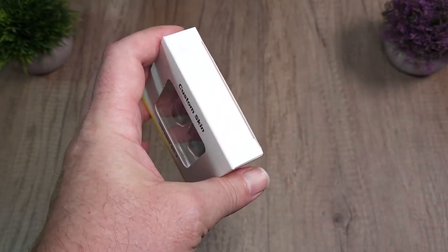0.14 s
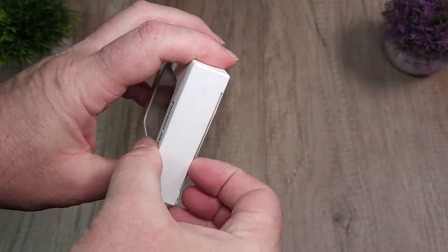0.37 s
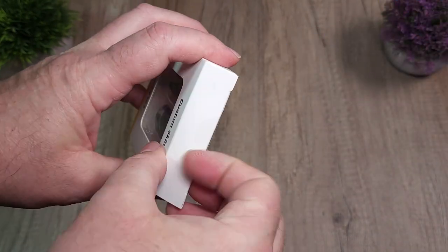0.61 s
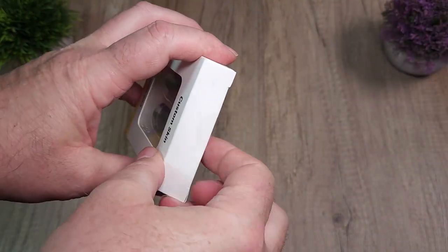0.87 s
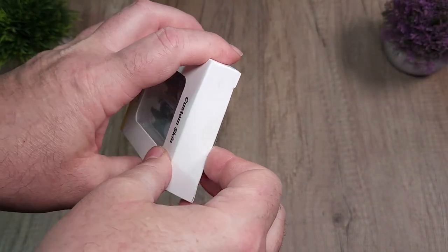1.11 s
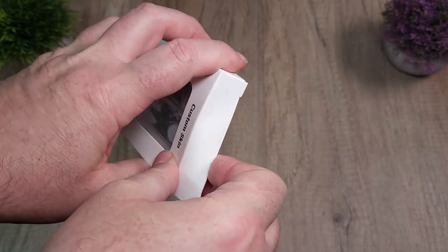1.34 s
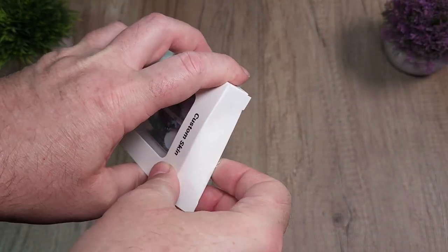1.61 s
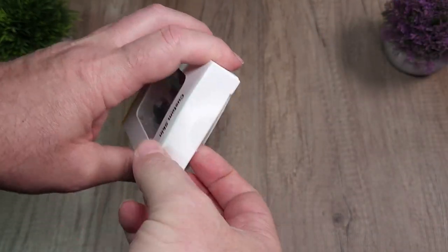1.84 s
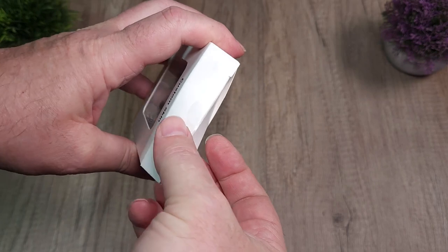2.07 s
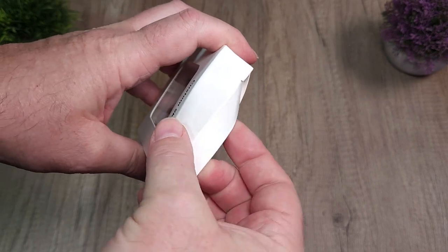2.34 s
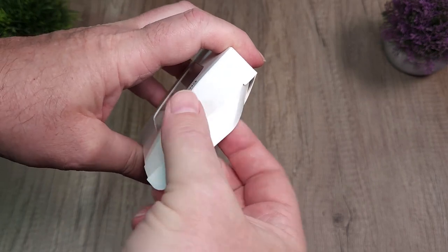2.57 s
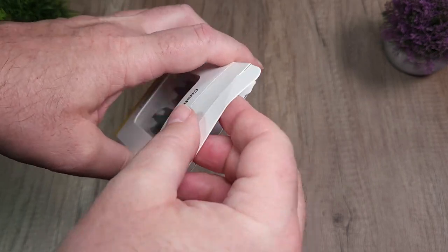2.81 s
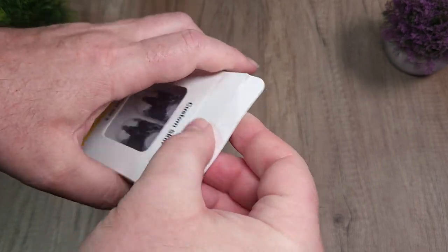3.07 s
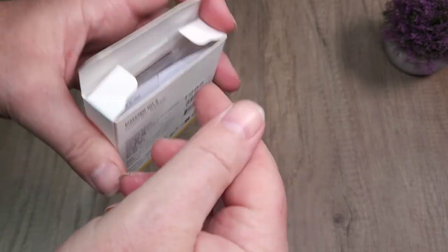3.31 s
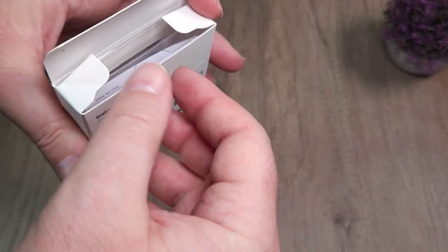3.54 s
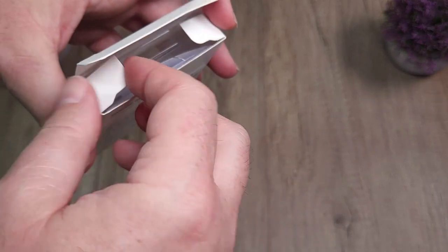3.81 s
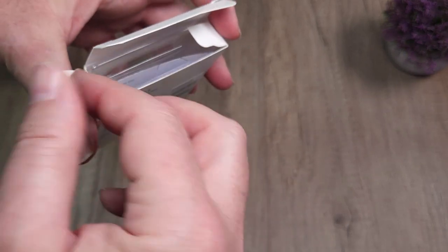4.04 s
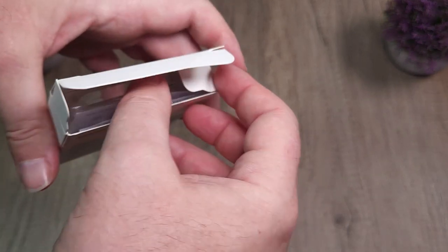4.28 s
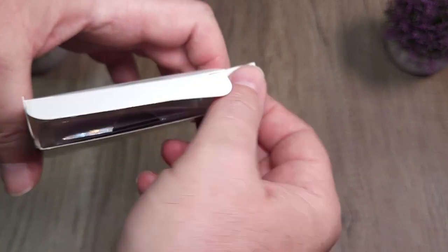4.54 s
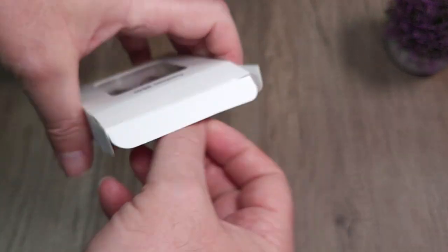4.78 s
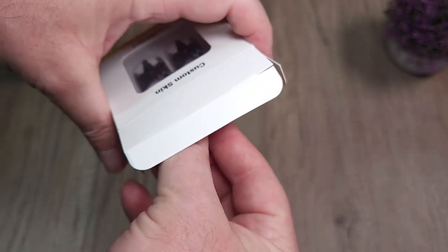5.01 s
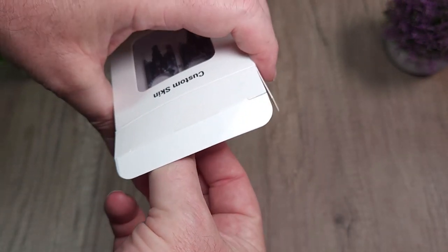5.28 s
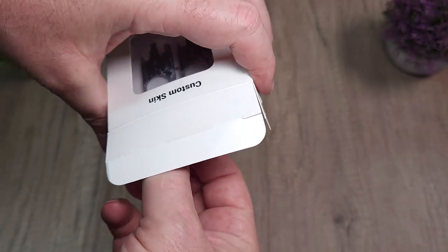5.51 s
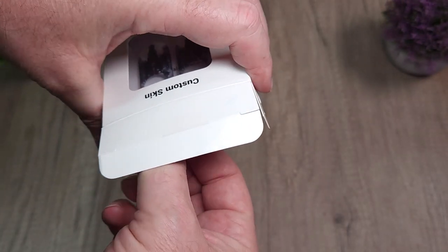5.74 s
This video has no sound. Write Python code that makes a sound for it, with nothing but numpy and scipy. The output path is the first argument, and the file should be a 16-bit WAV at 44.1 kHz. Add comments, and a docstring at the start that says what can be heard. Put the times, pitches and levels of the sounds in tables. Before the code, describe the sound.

Fingers pick and scrape at a small cardboard box in a quiet room, snapping its tucked flap loose, then lightly rustling and ticking the opened tabs.

```python
"""A small quiet room with faint air and hum: fingers pick at the tucked flap of a small card box until it
pops open, then fold the tabs out and reach inside. Slips of nail or card drive box modes with short
noise stutters and add treble cracks; freed edges twang as rising tones; between snaps, grains of
friction rub the box. The room answers with decaying noise; one close microphone."""
import sys
import numpy as np
from scipy import signal
from scipy.fft import rfft, irfft, next_fast_len
from scipy.io import wavfile
from scipy.ndimage import uniform_filter1d, map_coordinates

SR = 44100
rng = np.random.default_rng(int(sys.argv[2]) if len(sys.argv) > 2 else 0)


def undo_db(level):
    """Turn decibels back into plain size, where 20 dB means ten times bigger."""
    steps = np.asarray(level, float) / 20
    return 10 ** steps


def dump(signal):
    """Clip the signal to [-1, 1] and save it as 16-bit WAV at the path in sys.argv[1]."""
    limited = np.clip(np.atleast_2d(signal).T, -1, 1)
    pcm = np.round(limited * 32767).astype(np.int16)
    wavfile.write(sys.argv[1], SR, pcm)


N = 259308  # samples
OPEN_S = 2.95  # the flap comes free


def unit(x):
    """Scaled to rms 1."""
    return x / np.sqrt(np.mean(x ** 2) + 1e-20)


def along(points, hz):
    """(frequency [Hz], value) points read on a log frequency axis."""
    f, v = np.transpose(points)
    return np.interp(np.log(hz + 1), np.log(f + 1), v)


def coloured(x, points):
    """x filtered by a (frequency [Hz], gain [dB]) spectrum."""
    size = next_fast_len(len(x) + 8192)
    gain = undo_db(along(points, np.fft.rfftfreq(size, 1 / SR)))
    return irfft(rfft(x, size) * gain, size)[:len(x)]


def wobble(knots_per_s):
    """Smooth random curve through normal-distributed knots."""
    knots = rng.standard_normal(int(N * knots_per_s / SR) + 4)
    return map_coordinates(knots, [np.arange(N) * knots_per_s / SR])


# air noise spectrum: (frequency [Hz], relative density [dB])
AIR_SPECTRUM = [(25, -16), (50, -3), (85, 15.5), (119, 23.5), (160, 7), (500, -8), (1300, -5), (2000, -14),
                (3000, -18.5), (4400, -15.5), (5900, -6), (8000, -25), (16000, -26)]
# hum tones: (frequency [Hz], mean rms level [dB])
HUM_TONES = [(119, -75.5)]


def room_tone():
    """Steady coloured air noise plus a hum wavering in level and phase."""
    t = np.arange(N) / SR
    waver_db, drift_rad = 2.5 * wobble(10), 1.3 * wobble(10)
    hum = 0
    for hz, rms_db in HUM_TONES:
        hum = hum + np.sqrt(2) * undo_db(rms_db + waver_db) * np.sin(2 * np.pi * hz * t + drift_rad)
    air = undo_db(-78) * unit(coloured(rng.standard_normal(N), AIR_SPECTRUM))
    return air + hum


# room decay: (frequency [Hz], t60 [s])
ROOM_DECAY = [(150, 0.2), (1000, 0.13), (4000, 0.11), (12000, 0.17)]


def echo(x, length):
    """Diffuse room answer: fresh noise, each frequency dying at its own speed."""
    hz, t, bins = signal.stft(rng.standard_normal(SR // 3), SR, nperseg=256)
    t60 = along(ROOM_DECAY, hz)[:, None]
    tail = signal.istft(bins * undo_db(-60 * t / t60), SR, nperseg=256)[1]
    tail[:round(0.003 * SR)] = 0
    return signal.fftconvolve(x, tail / np.linalg.norm(tail))[:length]


# box modes, air cavity then walls then small bright panels:
# (nominal frequency [Hz], relative level [dB], t60 before damping [s])
BOX_MODES = [(227.2, -1, 0.089), (326.8, -13, 0.12), (395, 1, 0.042), (472, 1.5, 0.022), (509, -6, 0.03),
             (713, -10, 0.06), (804, -3, 0.22), (865.3, 2, 0.12), (979.6, 5, 0.066), (1086, 6, .07),
             (1181, 9.5, 0.042), (1418, 18.5, 0.019), (1650, 5.5, 0.023), (1816, 3, 0.012),
             (2282, 4.5, 0.036), (2431, -0.5, 0.047), (2622, 9.5, 0.014), (2984, -4.5, 0.015),
             (3374, -14.5, 0.061), (3860, -22, 0.033)]


def ringing(scatter_db, damping, grip_db_per_octave):
    """Impulse responses of cavity, walls and panels: decaying sines, scattered as for a new spot."""
    hz, db, t60 = np.transpose(BOX_MODES)[:, :, None]
    t = np.arange(SR // 5) / SR
    chance = rng.standard_normal((2, *hz.shape))
    bent_hz = hz * (1 + 0.012 * chance[0])
    db = db + grip_db_per_octave * np.log2(hz / 1000) + scatter_db * chance[1]
    modes = undo_db(db - 60 * t * damping / t60) * np.sin(2 * np.pi * bent_hz * t)
    modes = modes * (1 - np.exp(-t * hz / 0.74))  # card gives: a mode takes part of a cycle to build
    walls_hz, panels_hz = 580, 2000  # lower limits
    part = (hz[:, 0] > walls_hz).astype(int) + (hz[:, 0] > panels_hz)
    return np.array([modes[part == k].sum(axis=0) for k in range(3)])


# skin and card sliding: (start [s], length [s], wall level before the microphone [dB],
# squeeze on the hollow [dB], dryness of the contact [dB])
STROKES_TABLE = [(0, 0.033, -69.5, 1.5, 14), (0.058, .08, -78.5, 6, 13), (0.133, 0.18, -72, 8, 3),
                 (0.257, 0.16, -44.5, -15, -12), (0.268, 5.1, -74, 1, 11), (0.442, 0.11, -30, -30, -2),
                 (0.482, 0.045, -26, -41, -13), (0.603, 0.063, -59.5, -7.5, 3.5),
                 (0.693, 0.096, -44.5, -11, 2.5), (0.784, .11, -49, 3.5, 2), (0.935, 0.27, -50.5, -4, -9),
                 (1.095, 0.076, -50.5, -2, 2), (1.2, 0.17, -56, -3, -6), (1.343, 0.16, -43, -30, 9.5),
                 (1.498, 0.053, -33.5, -29, -8), (1.582, 0.084, -52.5, -4, 3.5), (1.716, 0.045, -53, -2, 2),
                 (1.746, .095, -44, -3, -3), (1.882, 0.097, -47.5, -1.5, 0), (1.926, 0.059, -35, -4.5, -8),
                 (2.055, 0.082, -56, 3, -10), (2.127, 0.21, -45, -8, -4.5), (2.225, 0.11, -35, -24, -6),
                 (2.287, 0.056, -39.5, -8, 2), (2.344, 0.1, -49, -11.5, 3.5), (2.503, 0.065, -50.5, -13, 4),
                 (2.561, 0.045, -37.5, -18, -0.5), (2.685, 0.064, -41.5, 1, -9),
                 (2.752, 0.063, -61, -1, 11), (2.932, .1, -63.5, -5, 6), (3.042, .14, -59.5, -7, 5),
                 (3.257, 0.059, -55, 0, 6.5), (3.384, 0.39, -65.5, 4, 1.5), (3.668, .13, -58.5, 4, -1.5),
                 (3.842, 0.12, -68.5, 4, -5), (3.918, 0.06, -54, -2, 5), (4.019, 0.21, -72.5, -6.5, 9.5),
                 (4.205, 0.043, -61, -4, 5), (4.254, 0.14, -45, -1, 0), (4.451, 0.11, -51, 1, 14),
                 (4.585, 0.26, -60, 4.5, 0), (4.872, 0.026, -29.5, -4, -3), (4.965, .18, -54.5, -1.5, -1),
                 (5.147, 0.2, -55, 0, -3), (5.363, 0.15, -56, -12, -3), (5.615, .13, -51.5, 1, 1),
                 (5.77, .11, -59.5, -1, 0.5)]
# hiss of sliding skin: (frequency [Hz], relative gain [dB])
SKIN_SPECTRUM = [(2500, -27.5), (3800, 3), (6000, 0.5), (7500, -7), (11000, -12.5), (16000, -24.5)]
ATTACK_S, SWELL_SHARE, RELEASE_DB_PER_S = 0.0066, 0.16, 351
PANELS_RUB_DB, HISS_RUB_DB = -7, -18  # re walls
SHUT_PANELS_DB = 0.5  # extra while the tucked flap scrapes the panels
PANEL_DRYNESS_SHARE = 0.34  # dryness lifts the hiss fully, the panels by this share
TICKS_PER_S, TICK_DB = 90, 11  # fibres catching


def stroke_gains():
    """Gain curves of walls, hollow, panels and hiss: strokes swell, then die when the finger stops."""
    start, length, db, squeeze_db, dryness_db = np.transpose(STROKES_TABLE)[:, :, None]
    t = np.arange(0, N + 64, 32) / SR
    swell = np.clip((t - start) / (ATTACK_S + SWELL_SHARE * length), 0, 1)
    shape = swell * undo_db(db - RELEASE_DB_PER_S * np.maximum(t - start - length, 0))
    panels_db = PANELS_RUB_DB + SHUT_PANELS_DB * (start < OPEN_S) + PANEL_DRYNESS_SHARE * dryness_db
    gains = []
    for layer_db in (0 * db, squeeze_db, panels_db, HISS_RUB_DB + dryness_db):
        total = np.sqrt(((shape * undo_db(layer_db)) ** 2).sum(axis=0))
        gains.append(np.interp(np.arange(N) / SR, t, total))
    return gains


def rub():
    """Clumped friction grains and catching fibres drive the box; a shifting grip tilts its modes."""
    clumps = undo_db(2.2 * wobble(45) + 1.7 * wobble(160))
    ticks = 1 + undo_db(TICK_DB) * (rng.random(N) < TICKS_PER_S / SR)
    grains = clumps * ticks * rng.standard_normal(N) * rng.exponential(1, N) ** 1.26
    slack = signal.fftconvolve(grains[None], ringing(3, 2.4, -6), axes=1)[:, :N]
    tight = signal.fftconvolve(grains[None], ringing(3, 2.4, 6), axes=1)[:, :N]
    tightness = np.clip(0.34 + 0.27 * wobble(36), 0, 1)
    hollow, walls, panels = [tightness * unit(b) + (1 - tightness) * unit(a)
                             for a, b in zip(slack, tight)]
    hiss = unit(coloured(grains, SKIN_SPECTRUM))
    walls_gain, hollow_gain, panels_gain, hiss_gain = stroke_gains()
    dry = walls_gain * walls + hollow_gain * hollow + panels_gain * panels + hiss_gain * hiss
    return dry + undo_db(-18.5) * echo(dry, N)


# free card edges letting go, pitch set by edge length:
# (time [s], starting frequency [Hz], nominal level before the microphone [dB], mean t60 [s])
TWANGS_TABLE = [(0.011, 2450, -58.5, 0.085), (0.265, 1530, -42, 0.06), (0.715, 3040, -14, 0.025),
                (2.292, 1603, -3, 0.017), (2.669, 2566, -17.5, .035), (2.92, 1444, -32, 0.043),
                (4.535, 3005, -24.5, 0.034), (4.567, 2000, -26, 0.026), (4.691, 1390, -35, .05),
                (4.851, 1610, -24.5, 0.024), (5.051, 1137, -35.5, 0.078)]
TWANG_RISE_PER_S = 0.8  # the edge straightens and its note climbs, as a share of the start


def twangs():
    """One rough, fading, rising sine for each freed edge."""
    out, t = np.zeros(N + SR), np.arange(SR // 5) / SR
    for start_s, hz, db, t60 in TWANGS_TABLE:
        noise = rng.standard_normal((2, len(t)))
        flutter = uniform_filter1d(noise, size=250, axis=1) * np.sqrt(250)
        phase = 2 * np.pi * hz * (t + TWANG_RISE_PER_S * t ** 2 / 2) + 0.82 * flutter[1]
        note = undo_db(db + 2.6 * flutter[0] - 60 * t / t60) * np.sin(phase)
        note *= 1 - np.exp(-t / 0.0017)
        out[round(start_s * SR):][:len(t)] += note + undo_db(-2) * echo(note, len(t))
    return out[:N]


# slips of nail and card: (time [s], dry wall peak before the microphone [dB],
# hollow thump re walls [dB], crack re walls [dB], grip [dB per octave])
SNAPS_TABLE = [(0.222, -58, -7, 2.5, -6), (0.263, -30.5, -12, -44, -2), (0.305, -30.5, -10, -25, 7),
               (0.334, -11.5, -22, -22.5, 0), (0.375, -26, -10, -17, -3), (.412, -33.5, -15, -26, -11),
               (0.466, -34, -32, -25, -10), (0.495, -26.5, -11, 2, -21), (.507, 5, -55, -62, -15.5),
               (.573, -15, -21, -40, -40), (0.684, -37, -16, -18, -12), (0.713, -17.5, -33, -11.5, -11),
               (.778, -4, -5, -19, 3), (.858, -26, -12, -16.5, -21), (.992, -50, -23, -31, -4),
               (1.111, -28.5, -38, -23, 0), (1.134, -38, -4, -9, -1), (1.185, -43, -22, -14, -8),
               (1.352, -32, -35, -15, -11), (1.371, -24.5, -41, -12, -14), (1.417, -20.5, -36, -39, -8),
               (1.44, -26.5, -37, -15.5, -13), (1.47, -22.5, -31, -17, 6), (1.495, -1, -27, -18.5, -6.5),
               (1.542, -22, -34, -23, -32), (1.619, -38, -17, -28, 3), (1.701, -26, -17, -20, 2),
               (1.758, -36.5, -7.5, -17, 12), (1.859, -16, -13, -28.5, -10.5),
               (1.947, -31.5, -22, -15, -12), (1.965, -13.5, -26, -24, -10), (2.064, -46, -3, -23, -14),
               (2.188, -34, -3.5, -20, -5), (2.229, -29.5, -8, -24, -6), (2.291, -1, -12.5, -23, -4),
               (2.325, -25, 1, -26, 6), (2.567, -31.5, -22, -25, -7), (2.589, -26, 0.5, -30, -4.5),
               (2.635, -37, -18, -18, -10), (2.649, -19, -22, -20.5, 7), (2.667, 3, -3.5, -20.5, -6),
               (2.819, -42.5, -9, -31, -3.5), (2.866, -49, -18, -15, 9), (2.911, -27, -30, -29, 1),
               (2.92, -16.5, -4, -51, 3.5), (2.983, -44.5, -3, -10, 8), (3.023, -47, -29, -31, 15),
               (3.047, -38.5, -21, -27, 13), (3.061, -35.5, -38, -21, 27), (3.075, -47, -30, -28, 19),
               (3.104, -30, -38, -21, 18), (3.168, -41.5, -18, -12, 19), (3.193, -41, -32, -13, 15),
               (3.215, -35.5, -28, -16, 7), (3.282, -33, -15, -6.5, 19), (3.371, -41, -18, -32.5, -5),
               (3.406, -50, -18, -22, -7), (3.425, -47.5, -24, -21, -7), (3.45, -45.5, -17, -19.5, -2),
               (3.488, -46, -23, -31, -1), (3.503, -44.5, -9, -24, -7), (3.524, -41.5, -17, -28, -6),
               (3.579, -45, 1.5, -22, 6), (3.62, -57, -19.5, -24.5, 2), (3.681, -35.5, 7, -42, -18),
               (3.714, -37, -16, -33, -31), (3.782, -43.5, -38, -27, -31), (3.803, -42, -26, -29, -1),
               (3.93, -35, -36, -28.5, 5), (3.967, -38, -10, -12, 4), (3.993, -49, -24, -27.5, 8),
               (4.075, -44.5, -27.5, -8.5, 21.5), (4.119, -51, -24.5, -34, -0.5),
               (4.149, -46.5, -22.5, -23, 4), (4.205, -39.5, -6.5, -13, 7), (4.261, -30, -16, -24, 14),
               (4.29, -17, -6.5, -26.5, -2.5), (4.314, -30.5, -22, -12, -4), (4.358, -32.5, -11, -22, 14),
               (4.465, -35.5, -19, -26, 17), (4.504, -16, -36, -17.5, -12.5), (4.515, -29.5, 7, 1, 0.5),
               (4.533, -20, -4, -9.5, 0), (4.565, -25, -24, -14, 14), (4.692, -31.5, -6.5, -24, -9),
               (4.719, -38.5, -1, -9, -3.5), (4.854, -35, -7.5, -21, 11), (4.88, -41, -31, -17, 9),
               (4.896, -20.5, 3, -15, -4.5), (4.975, -30.5, -10, -29, -13), (5.049, -28.5, -28, -12, 30),
               (5.112, -41, -24, -20, -30), (5.176, -31, -15, -14, 9), (5.215, -48, -9, -21, 1),
               (5.242, -33.5, -35, -19, -9), (5.286, -36.5, -14, -16.5, -7), (5.349, -54, -33, -30, 5),
               (5.402, -32.5, -20, -13.5, 22), (5.418, -40, -37, -10, 14), (5.439, -24.5, -21, -11, 22),
               (5.48, -40, -36, -9, 22), (5.502, -27, -28, -13, 22), (5.529, -27, -34, -7, 15),
               (5.549, -30.5, -40, -8, 13), (5.621, -33.5, -7, -23, 7), (5.627, -31, -12, -15, 9),
               (5.678, -31.5, -28, -12.5, 29), (5.693, -38, -39, -13, 21), (5.705, -28, -40, -9.5, 22),
               (5.825, -36.5, -26, -19, 19), (5.87, -33, -30, -14.5, 19)]
# treble crack: (frequency [Hz], mean relative gain [dB])
CRACK_SPECTRUM = [(2500, -22.5), (3800, 3.5), (6000, 1.5), (8000, -3.5), (11000, -11), (16000, -18)]
SLIP_MS, SLIP_MS_PER_DB, OPEN_SLIP_SHARE = 2.84, 0.2132, 0.62  # weak slips drag on; loose tabs let go sooner
# sharper slips and a tighter grip reach the bright panels
PANELS_DB, PANELS_DB_PER_CRACK_DB, PANELS_DB_PER_GRIP = -4.5, 0.28, 0.043


def snaps():
    """Each slip is a short stutter of the card edge, ringing the box and cracking in the treble."""
    out, t = np.zeros(N + SR), np.arange(SR // 5) / SR
    for start_s, db, thump_db, crack_db, grip in SNAPS_TABLE:
        opened = start_s > OPEN_S  # an open box rings shorter and holds less sound
        slip_ms = (SLIP_MS - SLIP_MS_PER_DB * db) * (OPEN_SLIP_SHARE if opened else 1)
        panels_db = PANELS_DB + PANELS_DB_PER_CRACK_DB * crack_db + PANELS_DB_PER_GRIP * grip
        u = 1000 * t / slip_ms
        fade = (1 - np.exp(-6 * u)) * np.exp(-u)  # long slips start softly

        # strong snaps let go more cleanly
        stutter = undo_db(-15.5 - 0.16 * db) * fade * rng.standard_normal(len(t)) ** 3
        # first blow of the nail, weak in long slips
        stutter[:24] += (2.19 + 1.5 * opened) / slip_ms * np.hanning(24) / 4

        response = ringing(1.4, 2.53 + 0.19 * opened, grip)
        rung = signal.fftconvolve(stutter[None], response, axes=1)[:, :len(t)]
        # the cavity answers mostly the first blow, which favours its upper modes
        blow = ringing(0.8, 3.5, grip_db_per_octave=3.5)[0]
        rung[0] = blow + 0.82 * rung[0] / np.abs(rung[0]).max()
        # the first swing is free, then the fingers damp the card
        rung[1:] *= 1 + 0.9 * np.exp(-(t / 0.002) ** 2)

        # no two edges crack alike
        edge = [(hz, gain_db + 4 * rng.standard_normal()) for hz, gain_db in CRACK_SPECTRUM]
        crack_shape = fade ** 4.5 + (0.35 - 0.35 * opened) * fade ** 0.5
        crack = coloured(rng.standard_normal(len(t)) * crack_shape, edge)

        parts = np.vstack([rung, crack])
        parts = parts / np.abs(parts).max(axis=1, keepdims=True)
        dry = undo_db([thump_db, 0, panels_db, crack_db]) @ parts
        room = undo_db(-5.0 - 2.54 * opened) * echo(dry, 2 * len(t))
        whole = np.pad(dry, (0, len(t))) + room
        out[round(start_s * SR):][:len(whole)] += undo_db(db) * whole
    return out[:N]


# microphone response to box and hands: (frequency [Hz], gain [dB])
MIC_RESPONSE = [(20, -51.5), (70, -18.5), (150, -17.5), (200, -14.5), (260, -6), (15600, 4), (16500, -71.5)]


def scene():
    """Box and hands reach the microphone thin in the bass; the room tone lies under them."""
    box_and_hands = rub() + twangs() + snaps()
    return (room_tone() + coloured(box_and_hands, MIC_RESPONSE))[None]


def top_cut(x):
    """Nothing passes above the cut-off."""
    return signal.sosfilt(signal.butter(12, 16640, fs=SR, output="sos"), x)


def record(dry):
    """The loudest peaks round off smoothly in the microphone's amplifier."""
    limit = 0.97
    rounded = dry / (1 + np.abs(dry / limit) ** 4) ** (1 / 4)
    return top_cut(rounded)


dry = scene()
out = record(dry)
dump(out)
```